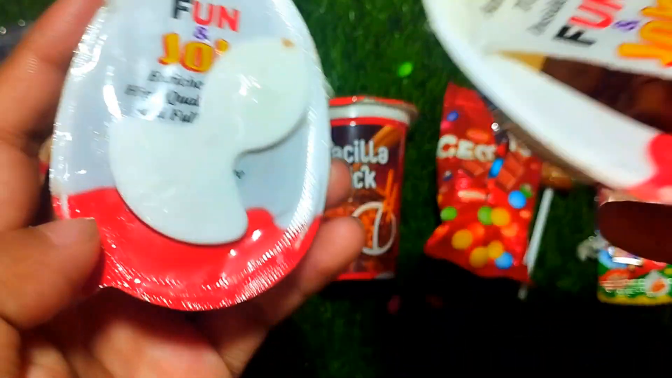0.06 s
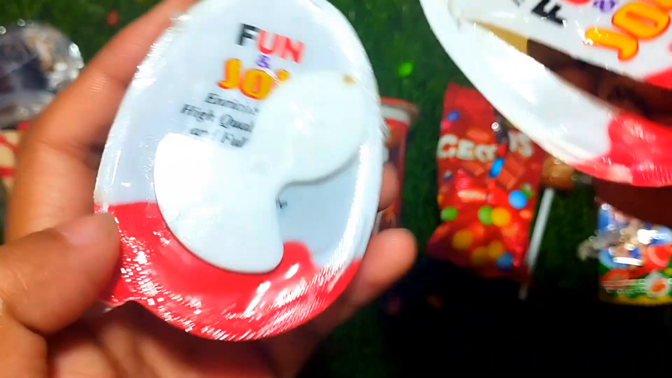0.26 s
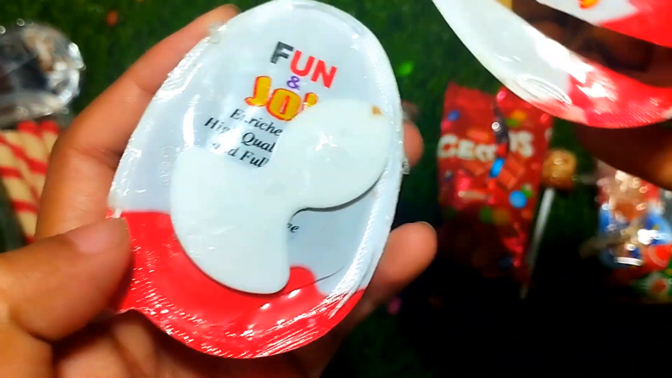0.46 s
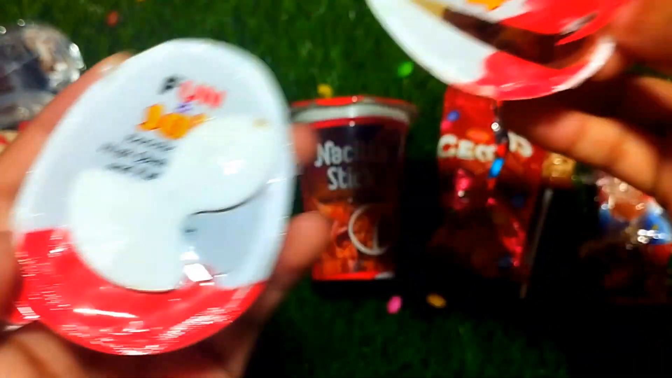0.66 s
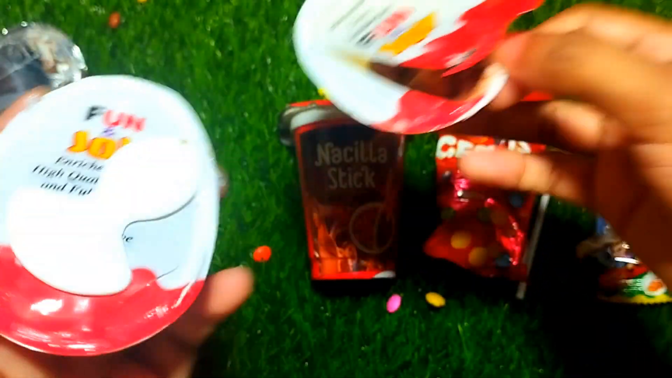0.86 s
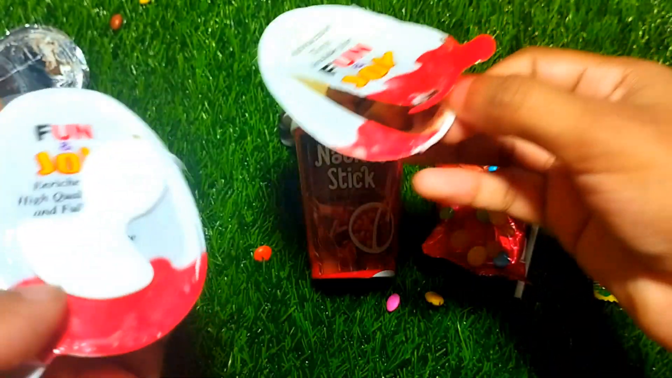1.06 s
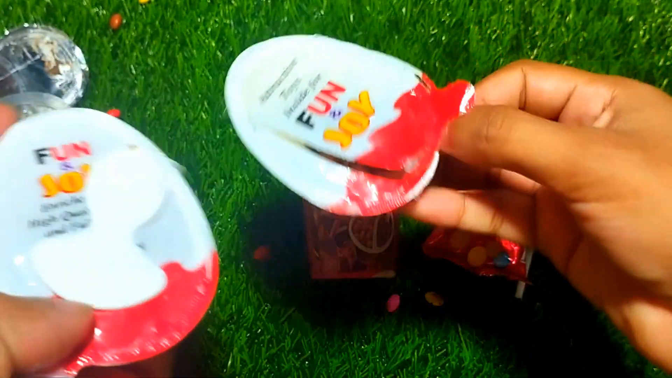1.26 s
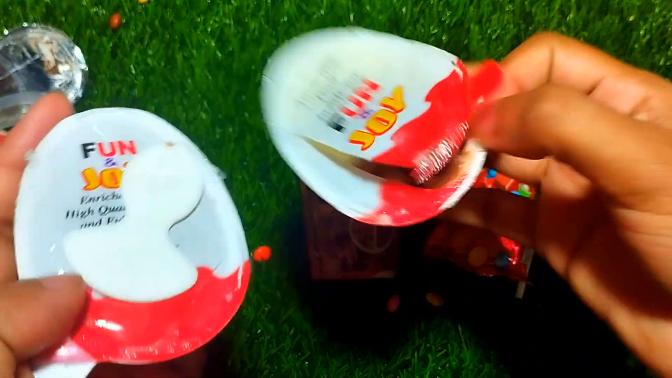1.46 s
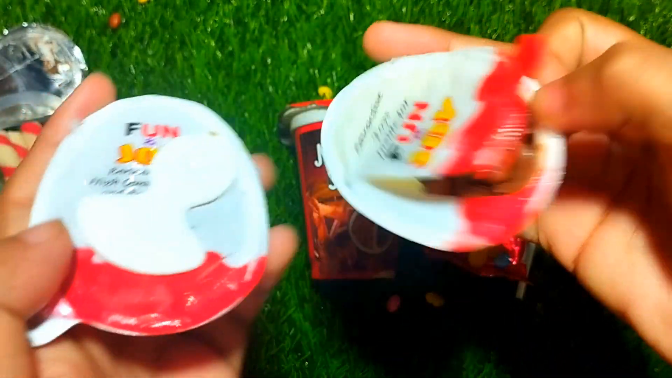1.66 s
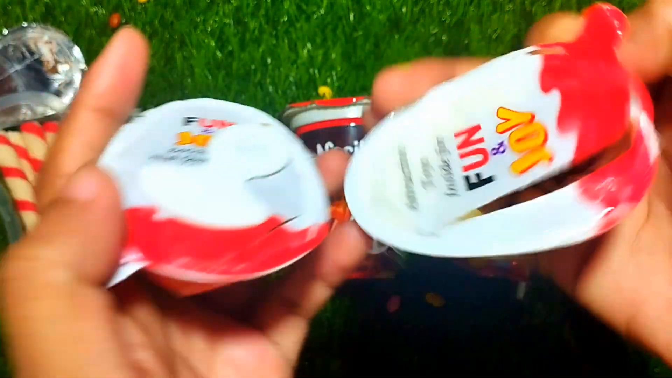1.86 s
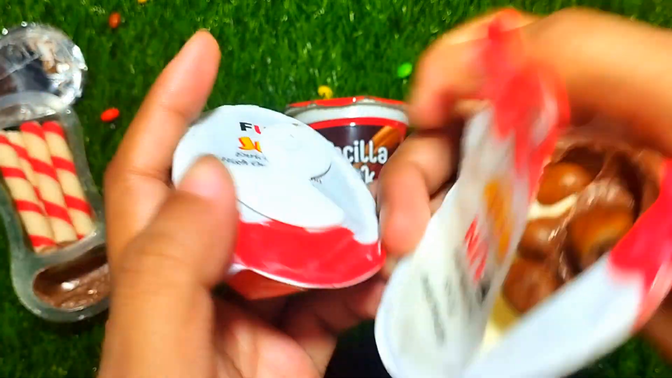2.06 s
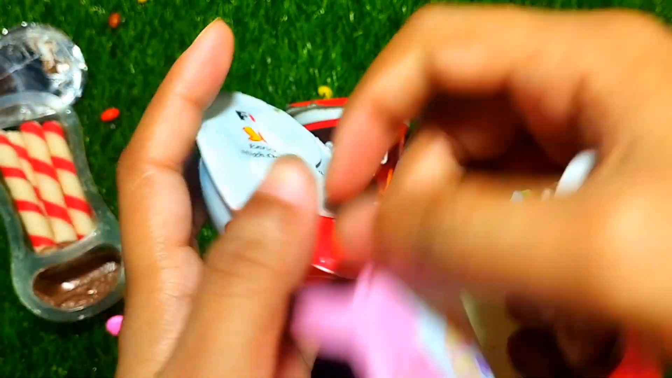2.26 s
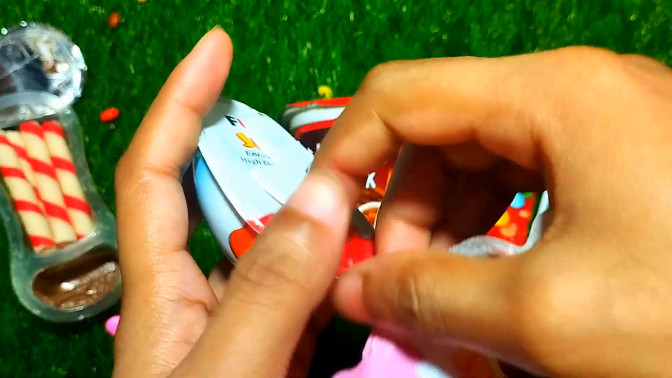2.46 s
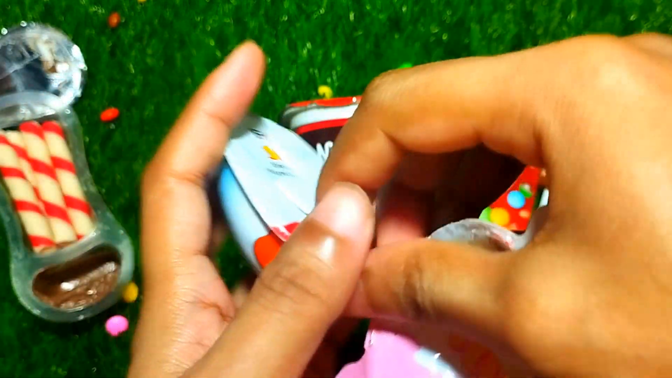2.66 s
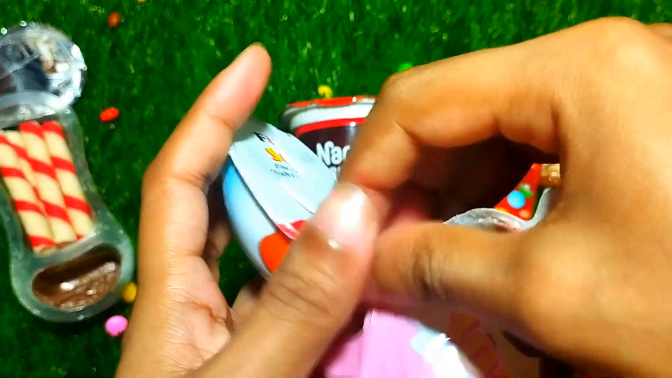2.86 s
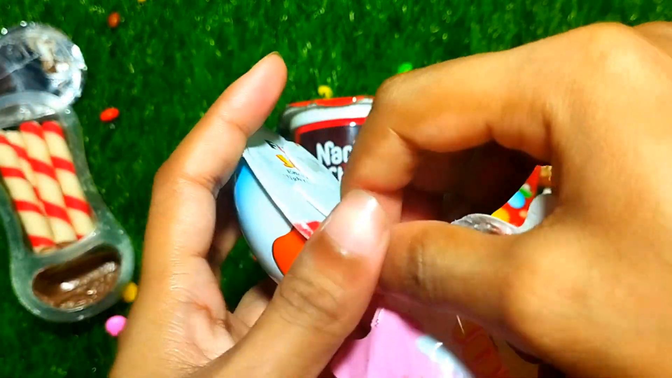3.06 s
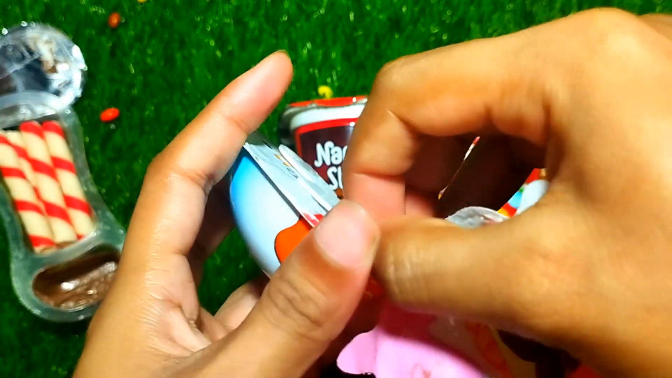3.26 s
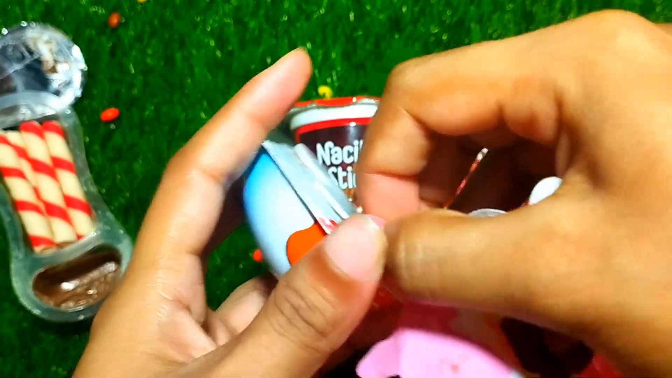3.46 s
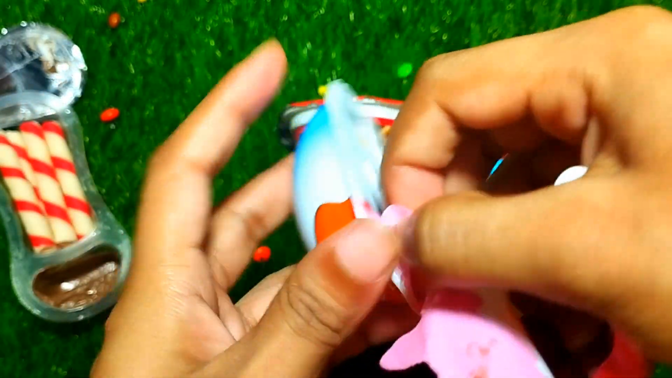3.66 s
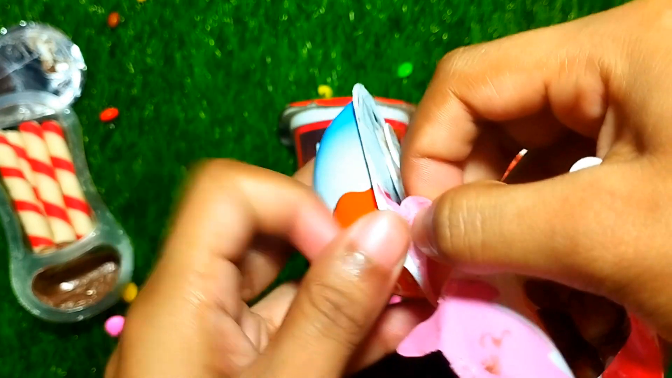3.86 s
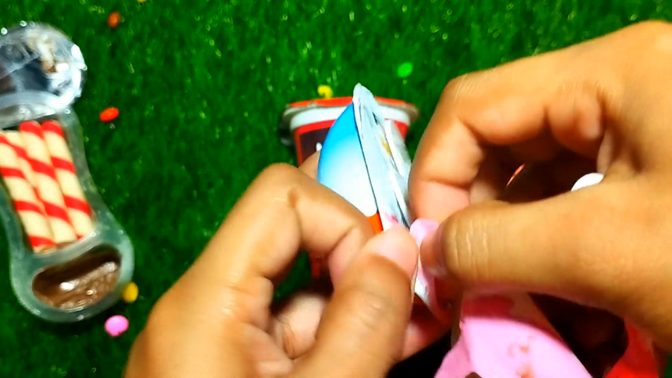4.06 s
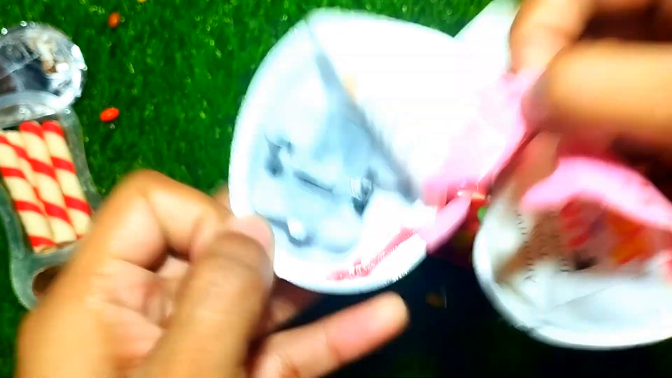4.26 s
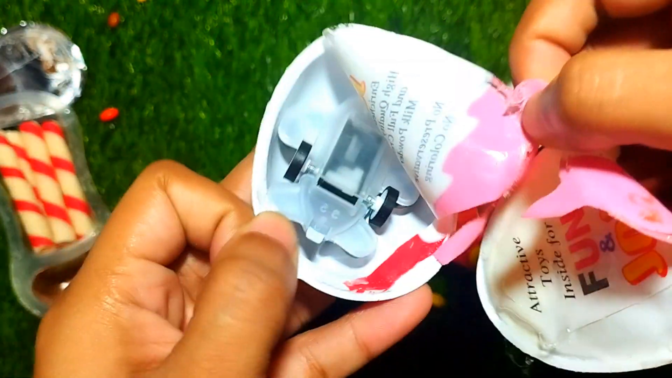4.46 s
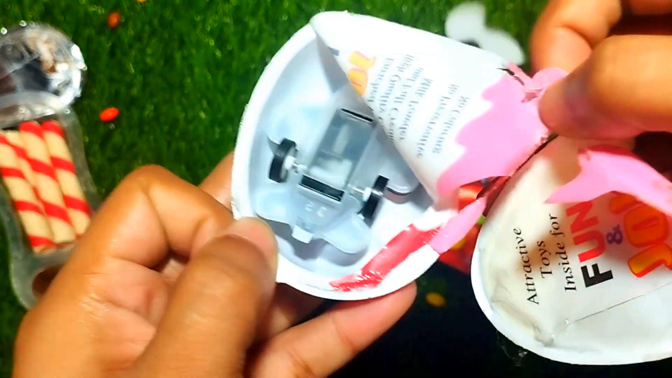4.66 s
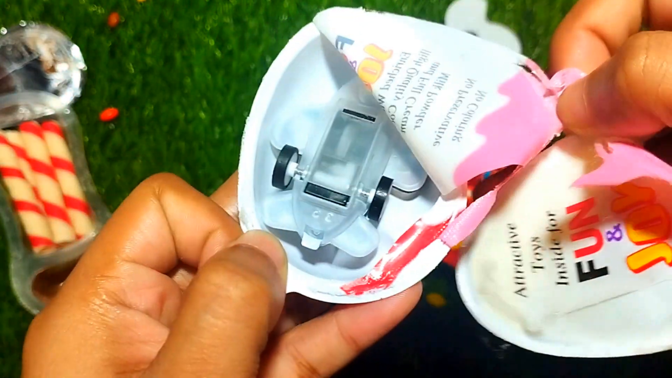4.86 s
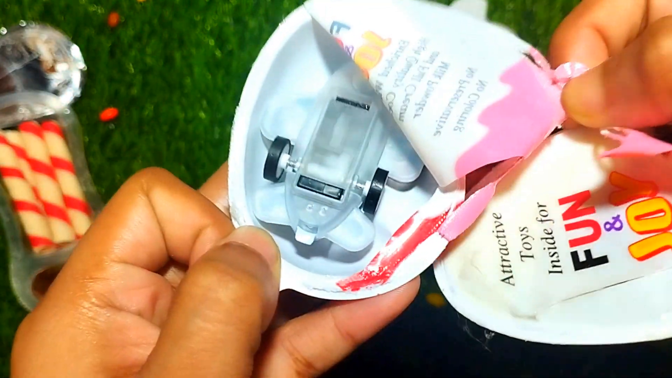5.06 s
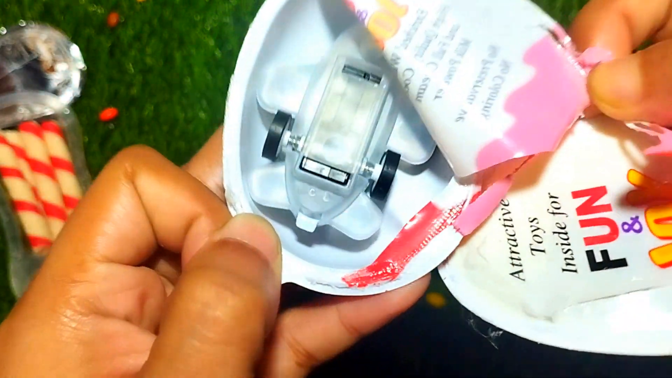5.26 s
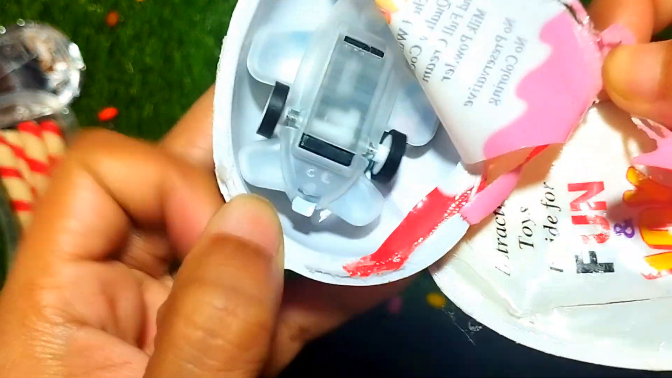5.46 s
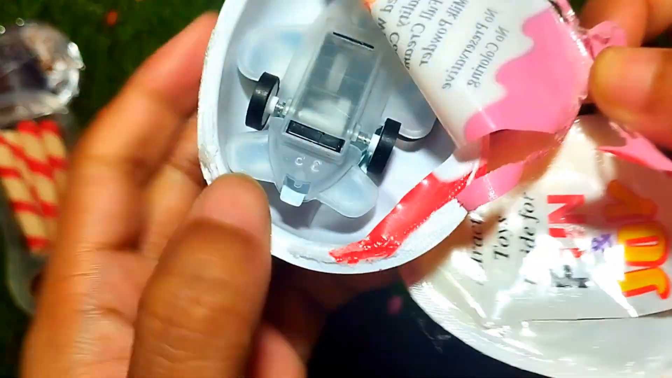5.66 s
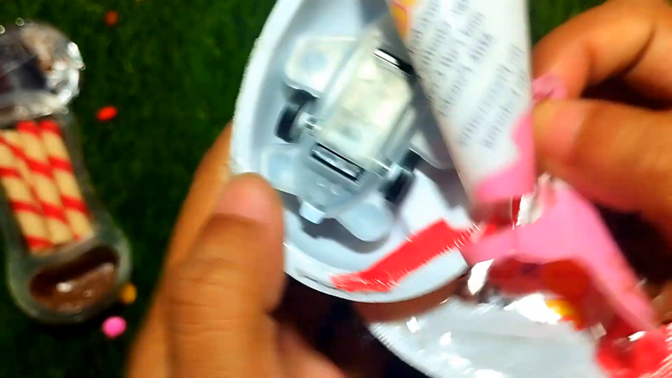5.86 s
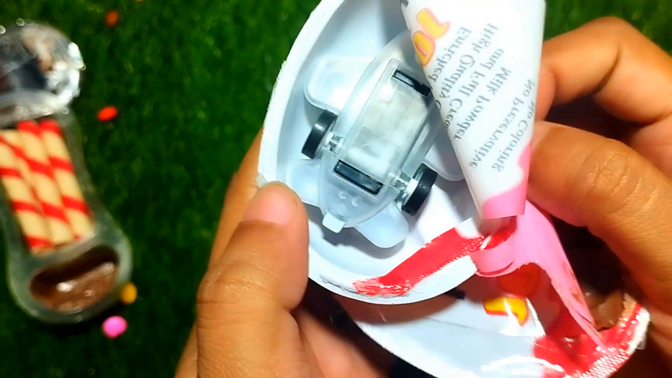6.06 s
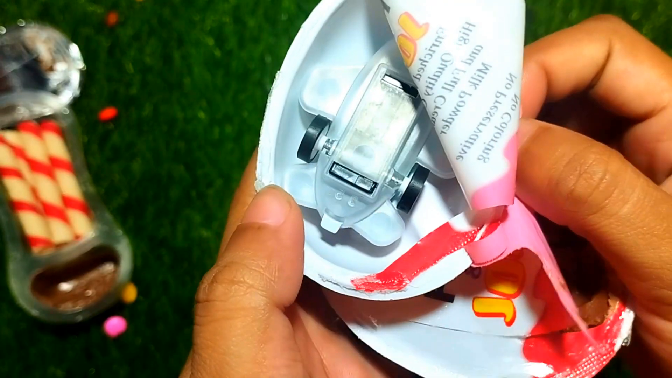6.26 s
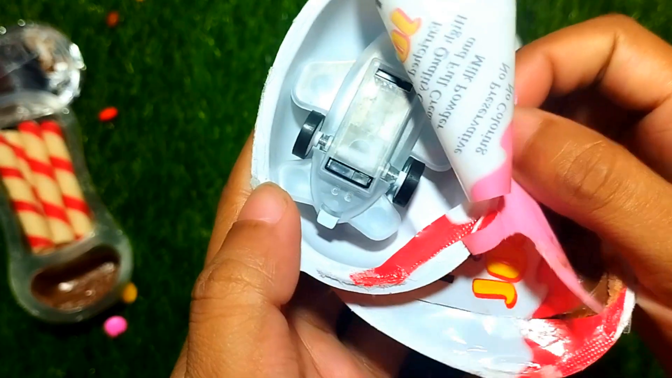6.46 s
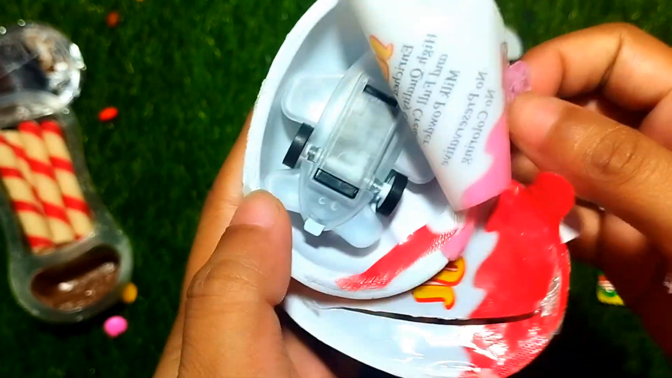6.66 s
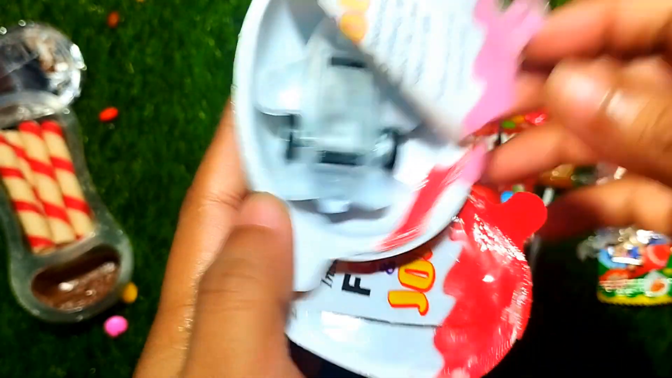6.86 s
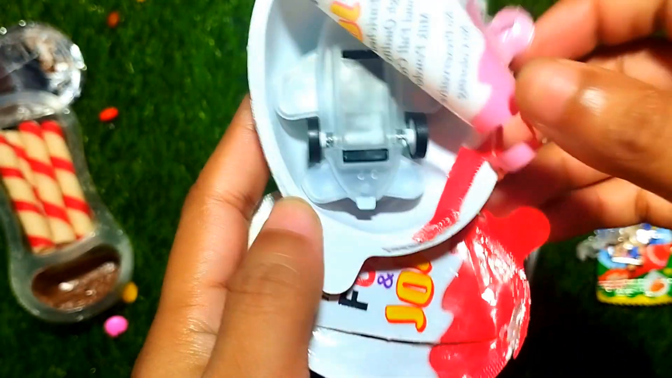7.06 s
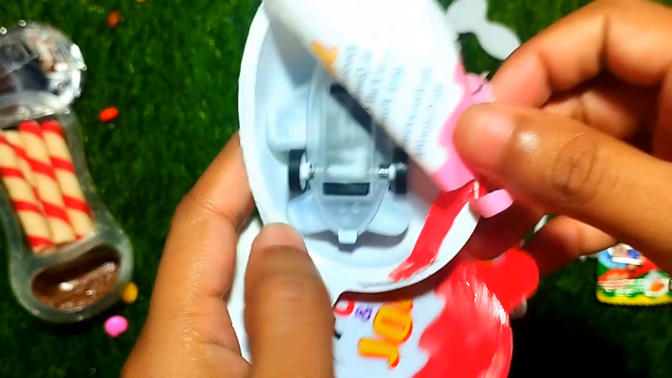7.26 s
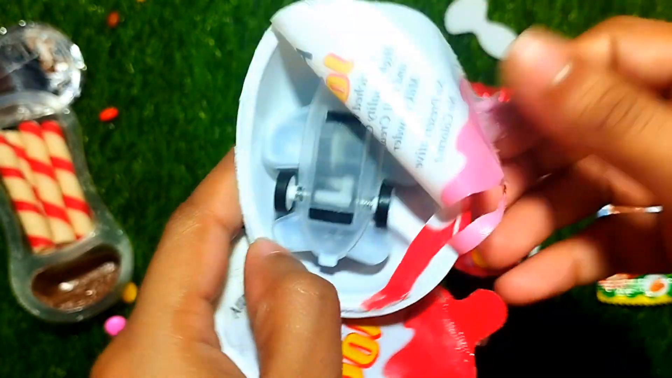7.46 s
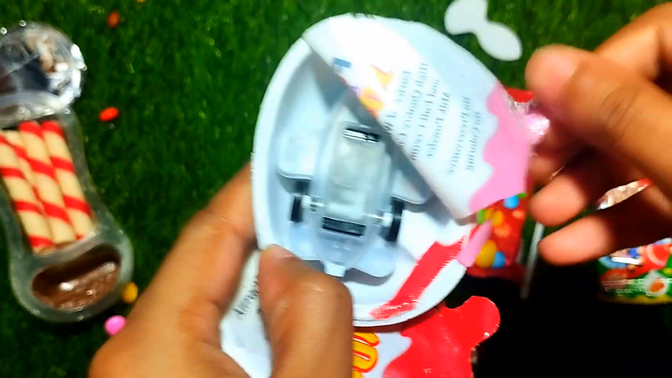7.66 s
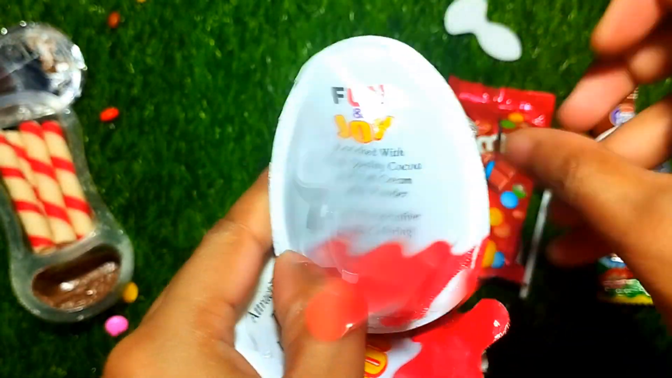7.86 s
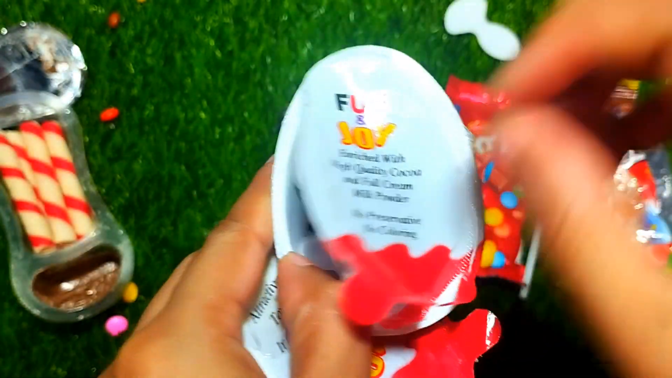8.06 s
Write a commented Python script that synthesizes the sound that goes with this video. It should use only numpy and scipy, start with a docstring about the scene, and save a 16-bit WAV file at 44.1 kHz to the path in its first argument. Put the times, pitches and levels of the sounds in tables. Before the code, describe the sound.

Close crinkles and snaps of a foil lid being picked, torn and folded back from a thin plastic cup, over a faint hum.

```python
"""Close, sharp crackles: fingers pick at the foil lid of a plastic candy egg, rip it off and fold it back.
Every buckle and tear rings the thin cup and the stiff foil for a few milliseconds.
Skin sticks and slips over the cup in squeaks, and the rim rasps along the fingers.
A small room answers; under it all lie a low, fan-like hum and a faint hiss."""
import sys
import numpy as np
from scipy import signal
from scipy.fft import rfft, irfft, next_fast_len
from scipy.io import wavfile
from scipy.ndimage import map_coordinates

SR = 44100
rng = np.random.default_rng(int(sys.argv[2]) if len(sys.argv) > 2 else 0)


def put_to_file(sound):
    """Save the sound as 16-bit audio at rate SR, in the file named by the first command-line argument."""
    columns = np.atleast_2d(sound).T  # one column per channel
    safe = np.clip(columns, -1, 1)
    whole_steps = np.round(safe * 32767)
    wavfile.write(sys.argv[1], SR, whole_steps.astype(np.int16))


N = 358533
CUP_HZ, CUP_DETUNE = 1930, 0.039  # detune: log spread per grip
FOIL_HZ, FOIL_DETUNE = 3800, 0.04  # detune: log spread per fold
LID_OPEN_S = 4.4
HIT_GAIN = np.sqrt(SR / 200)  # unit energy to unit rms over 5 ms

# distinct buckles: start_s, cup_db, cup_hz, foil_db, foil_hz, crack_db
BUCKLES = [(0.2565, -53, 1550, -48.5, 3970, -55), (.276, -61, 1830, -55, 3580, -56),
           (.302, -46, 1680, -64, 2880, -52.5), (.316, -43, 1740, -59, 4000, -58),
           (0.329, -45, 1790, -62, 4000, -60), (.349, -52, 1800, -65, 3800, -62),
           (0.9985, -39.5, 2150, -42.5, 3810, -50), (1.005, -41.5, 2050, -38.5, 3700, -55),
           (1.4552, -35, 1800, -26, 4000, -31.5), (1.586, -42.5, 1350, -61, 6250, -58),
           (1.599, -45, 1600, -59, 4100, -54), (1.827, -50, 1700, -52, 4000, -75),
           (1.87, -44.5, 1560, -64, 3630, -84), (1.8963, -39, 1500, -48.5, 4060, -59.5),
           (1.9067, -45, 1490, -66, 4000, -70), (1.939, -66, 1900, -57, 2900, -79),
           (1.977, -50.5, 2200, -48.5, 4600, -57), (2.014, -56, 1900, -49, 4400, -57),
           (2.0836, -45.5, 2300, -50.5, 2900, -59.5), (2.2101, -40.5, 1950, -64, 2940, -86),
           (2.3557, -41, 1800, -58, 2820, -64), (2.3847, -32, 1830, -38.5, 6840, -40.5),
           (2.398, -42, 1850, -54, 2900, -53), (2.4338, -34.5, 1610, -77, 2920, -87),
           (2.7461, -44.5, 2000, -51, 4000, -61), (2.77, -48.5, 2070, -53, 2900, -66),
           (2.8385, -22.5, 1910, -27.5, 3930, -31.5), (2.89, -44.5, 1600, -58, 3000, -55),
           (2.912, -56, 1930, -56, 6900, -46.5), (3.031, -35, 2010, -47, 4200, -59),
           (3.256, -53, 1900, -53, 5900, -61), (3.287, -51, 1550, -75, 3000, -74),
           (3.294, -33, 2200, -38.5, 4070, -36.5), (3.3292, -34.5, 2090, -45, 4120, -55),
           (3.346, -32.5, 2150, -37, 3000, -32), (3.3727, -37, 1960, -47, 2870, -51),
           (3.43, -48, 1980, -58, 2750, -57), (3.5003, -55, 1950, -64.5, 3020, -85),
           (3.5566, -49.5, 1560, -50.5, 4100, -50), (3.625, -41.5, 2740, -38, 3900, -50),
           (3.643, -41, 1900, -43, 5500, -58), (3.6795, -38, 2140, -43, 2790, -49.5),
           (3.7125, -62, 1900, -57, 6500, -55), (3.72, -58, 1800, -59, 6500, -59),
           (3.7365, -64, 1900, -62, 6500, -59), (3.7633, -50, 1590, -61, 6760, -48),
           (3.8048, -63, 1910, -53, 6300, -63), (3.931, -46.5, 1570, -55.5, 3800, -65),
           (3.9737, -47, 1540, -58, 3000, -86), (4.1628, -50, 1663, -62, 2900, -43),
           (4.187, -24, 1610, -26.5, 6600, -30), (4.1903, -21, 1730, -27, 5330, -41),
           (4.2103, -33, 1710, -29, 5800, -27.5), (4.2218, -39, 2600, -28, 4000, -32),
           (4.23, -17, 1650, -26.5, 4270, -35), (4.2324, -29, 1830, -27, 6340, -30),
           (4.2407, -15, 1850, -27, 4740, -31), (4.2628, -20, 2100, -26, 4300, -28.5),
           (4.2739, -24, 2330, -20.5, 4330, -28.5), (4.2827, -31, 2090, -27, 3620, -36),
           (4.2855, -22.5, 2120, -38, 2750, -40), (4.2955, -22, 1790, -35.5, 3600, -40.5),
           (4.3137, -19.5, 2145, -33, 3590, -39.5), (4.3329, -29, 2500, -22, 3066, -64),
           (4.339, -20, 2160, -18.5, 4430, -31.5), (4.38, -44, 1810, -40.5, 2750, -63),
           (4.4383, -53.5, 1900, -50.5, 6300, -68), (4.4478, -61, 1900, -54, 6250, -68),
           (4.5412, -32.5, 1840, -32.5, 3060, -49), (4.5562, -39, 1690, -43, 3700, -54),
           (4.5937, -44, 1800, -44, 3640, -63), (4.6183, -47, 1750, -49, 3700, -69),
           (4.6463, -44, 2050, -46, 4220, -62), (4.6506, -41, 2050, -47, 2850, -68),
           (4.6648, -53, 1750, -54, 3700, -73), (4.702, -48, 1500, -54.5, 3000, -76),
           (4.772, -55, 1420, -64, 3700, -85), (4.8283, -25, 1810, -20, 4360, -30.5),
           (5.5324, -43, 1830, -50, 2850, -80), (5.564, -27.5, 1716, -31.5, 2680, -38.5),
           (5.568, -36, 1900, -34, 5730, -43), (5.6436, -39, 2100, -41, 5560, -48),
           (5.6882, -60, 2000, -62, 6200, -55), (5.7765, -41, 2120, -54, 2750, -61.5),
           (5.7994, -41.5, 2530, -47, 4500, -56), (5.813, -46, 1890, -46, 2840, -52),
           (5.823, -38.5, 2000, -39, 2760, -56), (5.847, -42, 2000, -46, 4300, -51),
           (5.854, -40, 2040, -45, 3700, -53), (5.896, -37.5, 2120, -32, 2750, -54),
           (5.9123, -31.5, 2200, -35.5, 4700, -59), (5.9244, -31, 1950, -34.5, 2960, -59),
           (5.9373, -44, 1950, -36, 6040, -52), (5.9455, -39, 1980, -41, 3600, -61),
           (5.9866, -38.5, 2000, -46, 2710, -54), (5.9967, -39, 1940, -44, 2840, -59),
           (6.0067, -41, 1920, -40.5, 2750, -58), (6.0365, -58, 2000, -54, 5500, -80),
           (6.1206, -45, 2480, -31, 2980, -37), (6.3374, -57, 2030, -58, 3720, -73),
           (6.4398, -63, 1970, -55, 3680, -67), (6.4641, -58, 2520, -40.5, 6400, -48),
           (6.478, -46, 2080, -48, 3680, -60), (6.5168, -55, 1990, -57, 3700, -65),
           (6.5502, -45, 2070, -52, 2924, -60), (6.6146, -45, 1970, -55, 3710, -58),
           (6.6297, -42, 2070, -40, 3900, -49), (6.6451, -40, 2000, -49, 3700, -50),
           (6.653, -43, 1990, -41.5, 3050, -48), (6.672, -40.5, 1836, -43, 2780, -46.5),
           (6.6856, -41, 1870, -48, 2750, -50), (6.701, -42, 1720, -49, 2730, -55),
           (6.716, -42, 1700, -59, 2900, -71), (6.749, -37, 2060, -45, 2850, -52),
           (6.7629, -39, 1990, -44, 3900, -49), (6.7759, -40.5, 2750, -38, 3680, -54),
           (6.8123, -38.5, 2320, -49, 2750, -55), (6.84, -53, 2000, -57, 6200, -60),
           (6.8706, -38, 1900, -53, 2917, -59), (6.8877, -42, 2130, -42.5, 3060, -65),
           (6.9122, -52, 2160, -49, 6640, -51), (6.9422, -37, 2550, -36, 3830, -51),
           (6.991, -43.5, 2630, -52.5, 2750, -74.5), (7.2328, -56, 1880, -63, 2910, -80),
           (7.2981, -49, 1890, -63, 2900, -79), (7.3308, -41, 1670, -49, 3720, -55.5),
           (7.4324, -48, 2010, -56, 3720, -63), (7.4548, -36, 1900, -45, 6300, -44),
           (7.4674, -30, 2000, -49, 2900, -47), (7.492, -36, 1926, -29.5, 3100, -63),
           (7.509, -37.5, 1860, -51, 2850, -63), (7.5776, -39, 2000, -48, 3700, -55),
           (7.592, -43, 2010, -53, 3700, -65), (7.604, -40.5, 1930, -50, 2850, -62),
           (7.629, -41.5, 1970, -58, 3710, -64), (7.671, -35.5, 2030, -47, 2900, -57),
           (7.686, -49, 1910, -57, 3750, -70), (7.723, -56, 1900, -63, 2900, -89),
           (7.84, -46, 1890, -57, 2900, -79), (7.869, -29.5, 2110, -32, 2840, -57),
           (7.886, -33.5, 1860, -34, 2900, -61), (7.915, -41, 1900, -49, 2900, -66),
           (7.95, -40.5, 1810, -60, 2980, -63.5), (8.002, -46.5, 1930, -63, 2950, -88)]


def buckles(lead_t60_s=0.0032, flip_t60_s=0.01, settle_t60_s=0.018, lead_db=-8, settle_db=-22,
            sharp_db=-34.5, soft_db=-60.5, hard_db=-31, smear_hz_per_db=80):
    """A panel gives way, flips with a kick and chatters; soft buckles crumple more slowly."""
    out, lead = np.zeros(N), SR // 125
    t = np.arange(-lead, SR // 25) / SR
    kick = amp([[10], [17], [10]]) * (t == 0)  # cup, foil, crack
    for start, cup_db, cup_hz, foil_db, foil_hz, crack_db in list(BUCKLES) + small_buckles():
        softness = np.clip((sharp_db - crack_db) / (sharp_db - soft_db), 0, 1)
        age = abs(t) / (1 + 0.99 * softness)
        giving = amp(lead_db - 60 * age / lead_t60_s)
        chatter = amp(-60 * age / flip_t60_s) + amp(settle_db - 60 * age / settle_t60_s)
        pushes = rng.standard_normal((3, len(t))) * np.where(t < 0, giving, chatter) + kick
        # a hard snap bends the foil further and smears its ring
        smeared_hz = 380 + smear_hz_per_db * max(foil_db - hard_db, 0)
        sound = package(pushes, [cup_db, foil_db, crack_db], cup_hz, foil_hz, cup_width_hz=360,
                        foil_width_hz=smeared_hz, modes_db=-8 + 4 * softness, is_open=start > LID_OPEN_S)
        add(out, start - lead / SR, sound * HIT_GAIN)
    return out


# pulls on the seal: start_s, end_s, cup_db, foil_db, crack_db
SEAL_TEARS = [(3.621, 3.648, -42, -46, -56.5), (4.19, 4.228, -40, -43.5, -47.5),
              (4.22, 4.248, -29, -28.5, -32), (4.251, 4.301, -27, -30.5, -38),
              (4.298, 4.324, -28.5, -35.5, -40.5), (4.536, 4.569, -38, -41.5, -50),
              (4.57, 4.601, -41, -50.5, -60)]


def seal_tears(breaks_per_s=550, break_t60_s=0.005, spread_db=2.5, rub=0.13):
    """The seal holds and gives in a run of tiny breaks; each burst shakes the hollow cup."""
    out, t = np.zeros(N), np.arange(SR // 8) / SR
    burst = amp(-60 * t[:SR // 100] / break_t60_s)
    for start, end, cup_db, foil_db, crack_db in SEAL_TEARS:
        length = max(end - start, 0.01)
        pull = trapezoid(t, length, edge_s=0.0024)
        breaks = stick_slip(breaks_per_s, len(t), uneven=0.3) * random_gain(spread_db, len(t))
        pushes = (np.convolve(breaks, burst)[:len(t)] + rub) * rng.standard_normal((3, len(t)))
        sound = package(pushes * pull, [cup_db, foil_db, crack_db], cup_hz=1950, foil_hz=4000,
                        cup_width_hz=670, foil_width_hz=1500, modes_db=3.5, hollow_db=4.5)
        add(out, start, sound * np.sqrt(length * SR))
    return out


# rubbing, peeling and crumpling: start_s, end_s, cup_db, foil_db
FINGER_STROKES = [(0.04, 0.144, -60.5, -104), (0.295, 0.385, -55.5, -59), (0.391, 0.97, -77.5, -77),
                  (0.69, 0.707, -54.5, -71.5), (1.016, 1.113, -64.5, -64), (1.38, 1.397, -52, -55),
                  (1.577, 1.639, -48, -54), (1.766, 1.795, -50.5, -51.5), (1.809, 2.11, -62.5, -64),
                  (2.107, 2.396, -62.5, -68), (2.4, 2.434, -55, -74), (2.509, 2.727, -58, -66),
                  (3.311, 3.418, -62.5, -61.5), (3.601, 3.623, -52, -53.5), (3.663, 3.816, -57.5, -63),
                  (3.968, 4.06, -64, -65.5), (4.147, 4.2, -50.5, -56), (4.32, 4.408, -51, -57),
                  (4.569, 4.653, -49.5, -52.5), (4.654, 4.753, -62, -66), (5.425, 5.495, -55.5, -66.5),
                  (5.594, 5.721, -75, -63.5), (5.54, 5.582, -52, -46), (5.767, 5.832, -53.5, -51.5),
                  (5.837, 5.907, -55, -50.5), (5.89, 5.938, -43, -41.5), (5.951, 6.019, -50, -51.5),
                  (6.195, 6.446, -67.5, -68.5), (6.243, 6.258, -55, -59), (6.453, 6.564, -58.5, -58.5),
                  (6.608, 6.709, -50, -53), (6.741, 6.796, -56.5, -51), (6.86, 6.893, -58, -55),
                  (6.92, 6.95, -46.5, -48.5), (7.103, 7.214, -64, -68.5), (7.218, 7.463, -59, -65),
                  (7.485, 7.497, -37.5, -39), (7.455, 7.523, -45.5, -48.5), (7.564, 7.666, -53, -58.5),
                  (7.696, 8.01, -63, -76), (7.864, 7.894, -34.5, -39)]


def strokes(edge_s=0.013, clump_db=4.5, rub=0.24):
    """Slips and creases come in clumps over the smooth rub of skin and glue."""
    out, t = np.zeros(N), np.arange(2 * SR // 3) / SR
    for start, end, cup_db, foil_db in FINGER_STROKES:
        length = max(end - start, 0.01)
        effort = trapezoid(t, length, edge_s) * amp(clump_db * wobble(70, len(t)))
        creases_per_s = 850 * 10 ** ((cup_db + 42.5) / 50)  # denser under a hard pull
        pushes = crinkle(creases_per_s, len(t)) + rub * rng.standard_normal((3, len(t)))
        cup_hz, foil_hz = detuned_hz(*rng.standard_normal(2))
        sound = package(pushes * effort, [cup_db, foil_db, crack_level_db(foil_db)], cup_hz, foil_hz,
                        cup_width_hz=330, foil_width_hz=510, modes_db=8, is_open=start > LID_OPEN_S)
        add(out, start - edge_s / 2, sound * np.sqrt(length * SR))
    return out


def small_buckles(per_s=15, offset_db=-4, spread_db=4.5, max_cup_db=-46):
    """Extra BUCKLES rows: they fall at random in each stroke and follow its strength and brightness."""
    rows = []
    for start, end, cup_db, foil_db in FINGER_STROKES:
        times = start + (np.arange(12) + rng.random(12)) / per_s
        for s, (size, colour, grip, fold) in zip(times, rng.standard_normal((len(times), 4))):
            if s < end:
                lift_db = min(offset_db + spread_db * size, max_cup_db - cup_db)
                bright_db = foil_db + lift_db + spread_db * colour
                cup_hz, foil_hz = detuned_hz(grip, fold)
                rows.append((s, cup_db + lift_db, cup_hz, bright_db, foil_hz, crack_level_db(bright_db)))
    return rows


# skin and glue dragging over the cup: start_s, end_s, level_db, start_hz, end_hz
SKIN_SQUEAKS = [(2.507, 2.74, -53.5, 1880, 1950), (4.259, 4.263, -18.5, 1920, 2080),
                (4.303, 4.318, -23.5, 2090, 2130), (4.639, 4.653, -35, 1940, 2050),
                (6.528, 6.555, -43.5, 2200, 2020), (6.646, 6.69, -41.5, 2100, 1880)]


def squeaks(slips_per_s=550, width_hz=170, attack_s=0.015, spread_db=2.6):
    """Skin sticks and slips unevenly; the cup's ring shifts as the pressure changes."""
    out, t = np.zeros(N), np.arange(SR // 3) / SR
    for start, end, level_db, start_hz, end_hz in SKIN_SQUEAKS:
        length = max(end - start, 0.01)
        progress = np.clip(t / length, 0, 1)
        pressure = np.sqrt(np.minimum(t / attack_s, 1) * (1 - progress))
        pushes = stick_slip(slips_per_s, len(t), uneven=0.21) * pressure * random_gain(spread_db, len(t))
        early = (1 - progress) * ring(pushes, start_hz, width_hz)
        late = progress * ring(pushes, end_hz, width_hz)
        squeak = unit_energy(band(early + late, 700, 2400))
        add(out, start, amp(level_db) * squeak * np.sqrt(length * SR))
    return out


# a finger or the lid striking the cup: start_s, level_db, pitch_hz
CUP_KNOCKS = [(2.435, -43.5, 870), (2.8393, -39, 944), (4.1876, -24.5, 1010), (4.542, -42.5, 850),
              (4.556, -43, 541), (5.5632, -34, 1013), (5.568, -43, 576)]


def knocks(t60_s=0.023, attack_s=0.0012):
    """A blunt push sets one low mode of the cup swinging briefly."""
    out, t = np.zeros(N), np.arange(SR // 20) / SR
    envelope = amp(-60 * t / t60_s) * (1 - np.exp(-t / attack_s))
    for start, level_db, pitch_hz in CUP_KNOCKS:
        swing = unit_energy(np.sin(2 * np.pi * pitch_hz * t) * envelope)
        add(out, start, amp(level_db) * swing * HIT_GAIN)
    return out


# rim along the fingers after the rip: start_s, end_s, level_db
RIM_SCRAPES = [(4.538, 4.565, -38), (4.574, 4.62, -47), (4.627, 4.774, -59)]


def rim_scrapes(catches_per_s=400, rim_hz=984, width_hz=280, spread_db=3, rub=0.05):
    """The rim catches and lets go, driving a low mode in a coarse, hollow rasp."""
    out, t = np.zeros(N), np.arange(SR // 4) / SR
    for start, end, level_db in RIM_SCRAPES:
        length = max(end - start, 0.01)
        catches = stick_slip(catches_per_s, len(t), uneven=0.6) * random_gain(spread_db, len(t))
        pushes = (catches + rub * rng.standard_normal(len(t))) * trapezoid(t, length, edge_s=0.0031)
        rasp = unit_energy(band(ring(pushes, rim_hz, width_hz), 400, 1700))
        add(out, start, amp(level_db) * rasp * np.sqrt(length * SR))
    return out


def buckle_tails(gain_db=-18.5, t60_s=0.17, grains_per_s=700):
    """A faint, pitchless fizz fades after each distinct buckle."""
    out, t = np.zeros(N), np.arange(SR // 6) / SR
    for start, _, _, foil_db, _, _ in BUCKLES:
        fizz = unit_rms(crinkle(grains_per_s, len(t))[0]) + rng.standard_normal(len(t))
        add(out, start, amp(foil_db + gain_db - 60 * t / t60_s) * fizz)
    return band(out, 1100, 5500, order=1)


def finger_brushing(cup_db=-70, foil_db=-76, crack_db=-97):
    """Fingers brush softly over the package even while only holding it."""
    pressure = amp(2.5 * wobble(4, N) + 2.5 * wobble(45, N))
    pushes = pressure * rng.standard_normal((3, N))
    return package(pushes, [cup_db, foil_db, crack_db], cup_hz=2000, foil_hz=3900,
                   cup_width_hz=320, foil_width_hz=700, modes_db=0) * np.sqrt(N)


# hollow cup, relative to its main ring: pitch_hz, width_hz, gain_db, lid_open_change_db
CUP_MODES = [(347, 270, -14.5, 4.5), (734, 100, -30.5, 5.5), (1003, 370, -16, 0), (1490, 650, -10.5, -10)]
# stiff foil lid: pitch_hz, width_hz, gain_db
LID_MODES = [(2750, 510, 2), (3720, 230, -0.5), (4174, 400, -4), (5500, 690, -8), (6134, 190, -6),
             (6760, 190, -18.5)]
# top of the lid's range, reached by a crack: pitch_hz, width_hz, gain_db
LID_TOP_MODES = [(6600, 1800, 4), (8830, 470, 0), (9920, 1100, 0), (11950, 1200, -4), (14500, 2800, 4)]


def package(pushes, levels_db, cup_hz, foil_hz, cup_width_hz, foil_width_hz, modes_db,
            is_open=False, hollow_db=0):
    """Three rows of pushes drive cup ring, foil ring and bare crack; levels_db sets their energies."""
    hollow = [(hz, width, db + hollow_db + open_db * is_open) for hz, width, db, open_db in CUP_MODES]
    cup = ring(pushes[0], cup_hz, cup_width_hz) + resonances(pushes[0], hollow)
    foil = ring(pushes[1], foil_hz, foil_width_hz) + amp(modes_db) * resonances(pushes[1], LID_MODES)
    crack = resonances(pushes[2], LID_TOP_MODES)
    # the more a crack stands out over the foil, the higher it reaches
    reach_hz = np.clip(15000 * 2 ** ((levels_db[2] - levels_db[1]) / 24), 9000, 17000)
    parts = band(cup, 180, 2200, order=3), band(foil, 2450, 7500, order=3), band(crack, 5400, reach_hz)
    return sum(amp(db) * unit_energy(part) for db, part in zip(levels_db, parts))


def resonances(x, modes, grip_db=2.5, detune=0.02):
    """A bank of modes; each new grip shifts their levels and pitches."""
    chance = rng.standard_normal((len(modes), 2))
    return sum(amp(db + grip_db * lift) * ring(x, hz * np.exp(detune * shift), width)
               for (hz, width, db), (lift, shift) in zip(modes, chance))


def detuned_hz(grip, fold):
    """The grip detunes the cup, the fold the foil."""
    return CUP_HZ * np.exp(CUP_DETUNE * grip), FOIL_HZ * np.exp(FOIL_DETUNE * fold)


def crack_level_db(foil_db, offset_db=-11, usual_crease_db=-47.5):
    """Hard creases crack more brightly than soft rubs."""
    return foil_db + offset_db + 0.11 * min(foil_db - usual_crease_db, 10)


def crinkle(per_s, size, spread_db=2.5, colour_db=5):
    """Three rows of tiny, randomly timed pushes of unequal size and colour."""
    sizes = amp(spread_db * np.minimum(rng.exponential(size=size), 2.8))
    grains = (rng.random(size) < per_s / SR) * sizes * rng.choice([-1, 1], size)
    return grains * random_gain(colour_db, (3, size))


def stick_slip(per_s, size, uneven):
    """One unit push per slip, at a wandering rate."""
    slipped = np.cumsum(per_s * np.exp(uneven * wobble(300, size))) / SR
    return np.diff(np.floor(slipped), prepend=0)


# near surfaces: delay_s, gain_db
WALL_ECHOES = [(.0049, -29), (.0099, -19), (0.02, -23.5)]


def walls(x):
    """The direct sound, combed by a few early echoes."""
    out = x.copy()
    for delay_s, gain_db in WALL_ECHOES:
        add(out, delay_s, amp(gain_db) * x)
    return out


# room decay: frequency_hz, t60_s
ROOM_DECAY = [(200, 0.38), (2000, 0.22), (6000, 0.22), (15000, 0.09)]


def room(x, delay_s=0.0026):
    """The room's diffuse tail; it changes as the hands move."""
    out, step = np.zeros(N), SR // 3
    for start in range(0, N, step):
        hz, t, spectrum = signal.stft(rng.standard_normal(SR // 2), SR, nperseg=256)
        decay = amp(-60 * t / along(ROOM_DECAY, hz)[:, None])
        tail = unit_energy(signal.istft(spectrum * decay, SR, nperseg=256)[1])
        add(out, start / SR + delay_s, signal.fftconvolve(x[start:start + step], tail))
    return out


# hum spectrum: centre_hz, width_hz, relative_db
HUM_HUMPS = [(19.4, 30.2, 4.5), (56.5, 1.8, -2), (76.36, 6.1, 3.5), (89.6, 12, -7), (97.1, 19.9, 1),
             (144, 11.7, -6), (166.7, 11, -9.5), (194.9, 16.4, -8.5), (251, 9.8, -22), (284.8, 11, -22.5),
             (386.4, 1.4, -22.5), (505, 3.4, -25.5)]
# hum level over time: time_s, deep_db, upper_db
HUM_SWELLS = [(0, -32.5, -42.5), (.6, -34, -43), (1.5, -31.5, -43.5), (1.75, -29.5, -43.5),
              (2.2, -33.5, -40.5), (2.9, -35.5, -44.5), (3.08, -30.5, -41), (3.35, -31.5, -49.5),
              (3.6, -34, -45), (4.2, -35, -47.5), (8.13, -34.5, -47)]


def hum(split_hz=125):
    """Fan-like, wavering humps of low noise: a deep group and a weaker one above it."""
    def humps(rows):
        return noise(lambda f: sum(amp(db) / (1 + (2 * (f - hz) / width) ** 2) for hz, width, db in rows))

    times, deep_db, upper_db = np.transpose(HUM_SWELLS)
    t = np.arange(N) / SR
    deep = humps([row for row in HUM_HUMPS if row[0] < split_hz])
    upper = humps([row for row in HUM_HUMPS if row[0] >= split_hz])
    return deep * amp(np.interp(t, times, deep_db)) + upper * amp(np.interp(t, times, upper_db))


# room air: frequency_hz, relative_db
AIR_SPECTRUM = [(30, -21), (230, 9.5), (380, 8), (600, 5), (1200, -5), (2000, -17.5), (3100, -12.5),
                (4200, -39), (6500, -43), (9000, -47), (16000, -53)]


def air(level_db=-59):
    """The room's faint, steady hiss."""
    return amp(level_db) * noise(lambda hz: amp(along(AIR_SPECTRUM, hz)))


def amp(db):
    return 10 ** (np.asarray(db) / 20)


def random_gain(spread_db, size):
    return amp(spread_db * rng.standard_normal(size))


def unit_rms(x):
    return x / np.sqrt(np.mean(x ** 2) + 1e-20)


def unit_energy(x):
    return x / (np.linalg.norm(x) + 1e-12)


def trapezoid(t, length_s, edge_s):
    return np.clip(t / edge_s, 0, 1) * np.clip((length_s + edge_s - t) / edge_s, 0, 1)


def along(points, hz):
    """Interpolate on a log frequency axis."""
    knots_hz, values = np.transpose(points)
    return np.interp(np.log(hz + 1), np.log(knots_hz), values)


def wobble(knots_per_s, size):
    """A smooth random curve."""
    knots = rng.standard_normal(size // 50)
    return map_coordinates(knots, [np.arange(size) * knots_per_s / SR], mode="wrap")


def noise(gain):
    """Unit-rms noise coloured by gain(hz)."""
    size = next_fast_len(N + 8192)
    spectrum = rfft(rng.standard_normal(size)) * gain(np.fft.rfftfreq(size, 1 / SR))
    return unit_rms(irfft(spectrum, size)[:N])


def band(x, low_hz, high_hz, order=2):
    return signal.lfilter(*signal.butter(order, [low_hz, high_hz], "bandpass", fs=SR), x)


def ring(x, hz, width_hz):
    """One damped resonance."""
    return signal.lfilter(*signal.iirpeak(hz, hz / width_hz, fs=SR), x)


def add(track, start_s, sound):
    start = max(round(start_s * SR), 0)
    part = track[start:start + len(sound)]
    part += sound[:len(part)]


def scene(room_db=-20, treble_side_db=-18, room_side_db=-39):
    """Everything sits in the centre; only the treble and the room spread a little."""
    hands = (buckles() + buckle_tails() + knocks() + seal_tears() + rim_scrapes()
             + strokes() + squeaks() + finger_brushing())
    mid = walls(hands) + amp(room_db) * room(hands) + hum() + air()
    side = amp(treble_side_db) * band(np.roll(mid, SR // 1500), 5700, 20000)
    side += amp(room_side_db) * band(room(hands), 450, 16000)
    return np.array([mid + side, mid - side])


def record(dry, top_hz=16500):
    """The phone's treble falls away steeply at its band limit."""
    size = next_fast_len(N + 8192)
    hz = np.fft.rfftfreq(size, 1 / SR)
    return irfft(rfft(dry, size) / (1 + (hz / top_hz) ** 90), size)[:, :N]


dry = scene()
out = record(dry)
put_to_file(out)
```